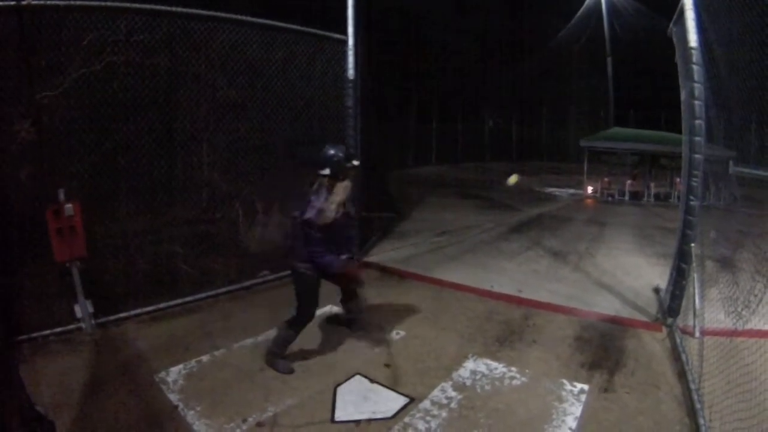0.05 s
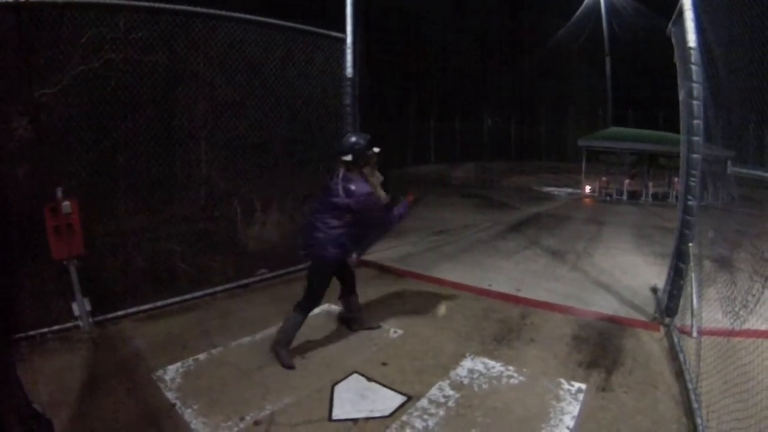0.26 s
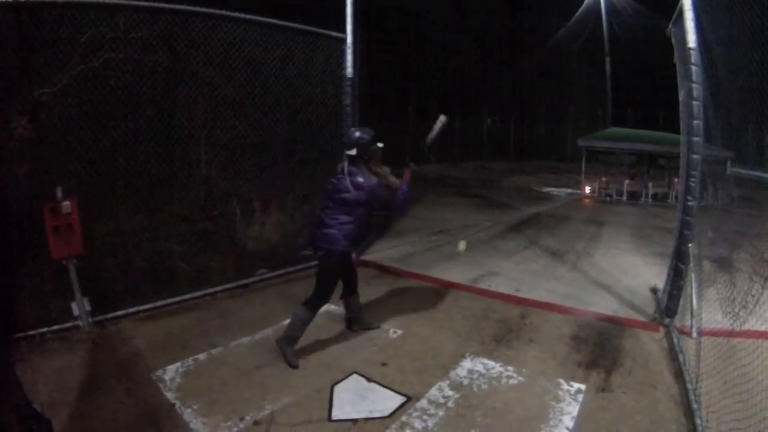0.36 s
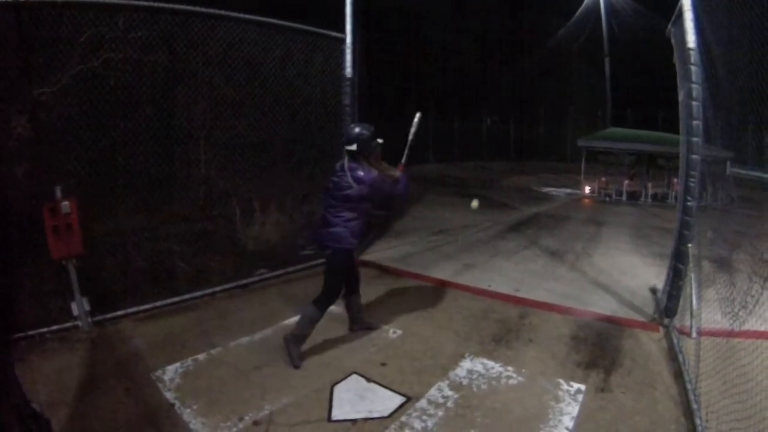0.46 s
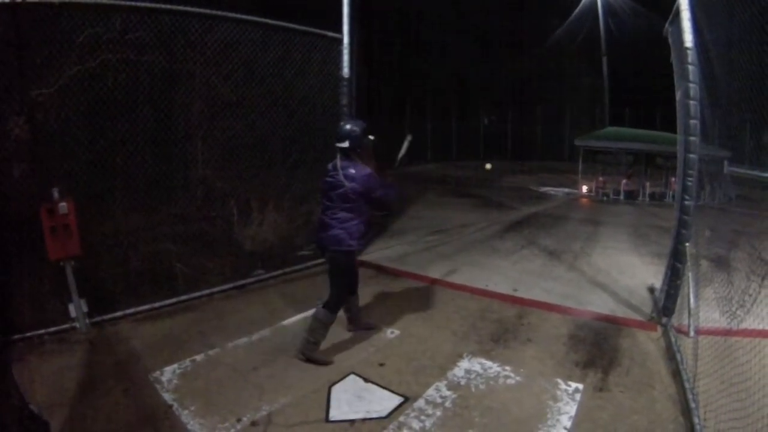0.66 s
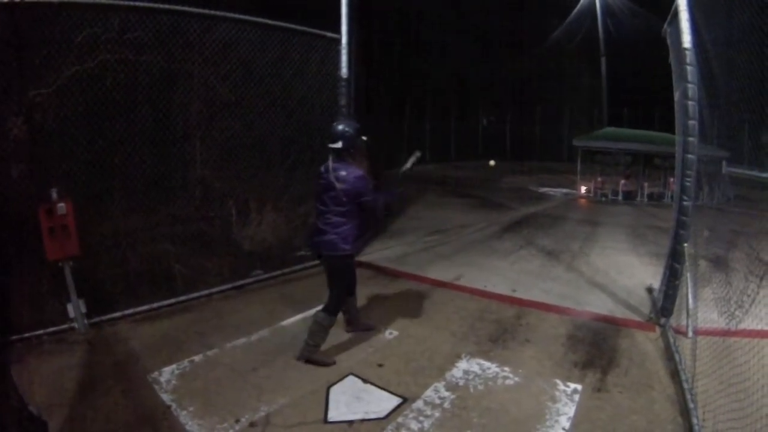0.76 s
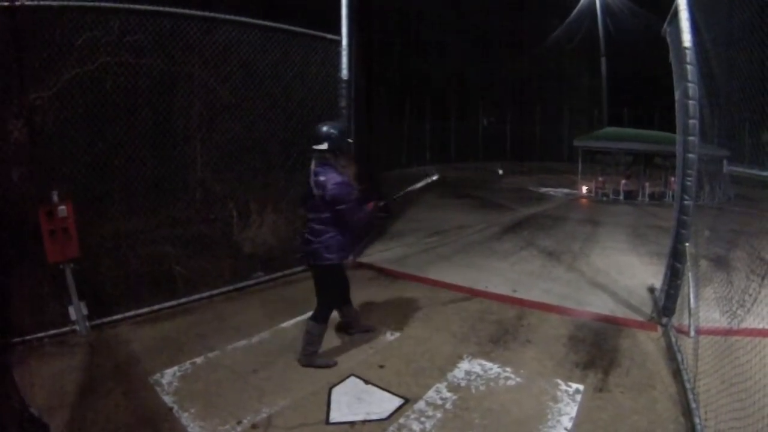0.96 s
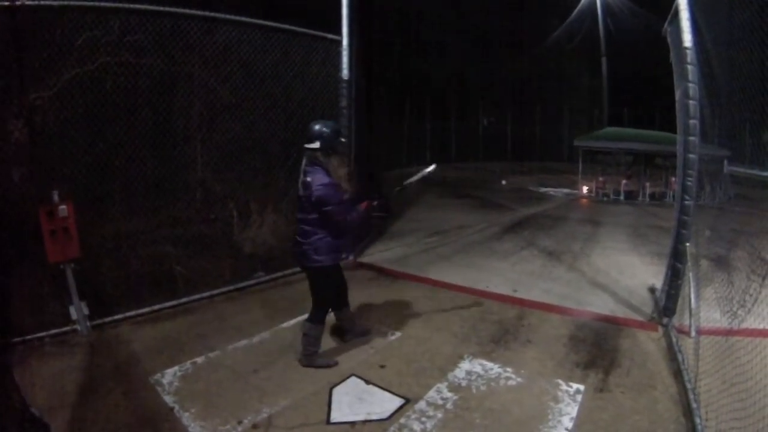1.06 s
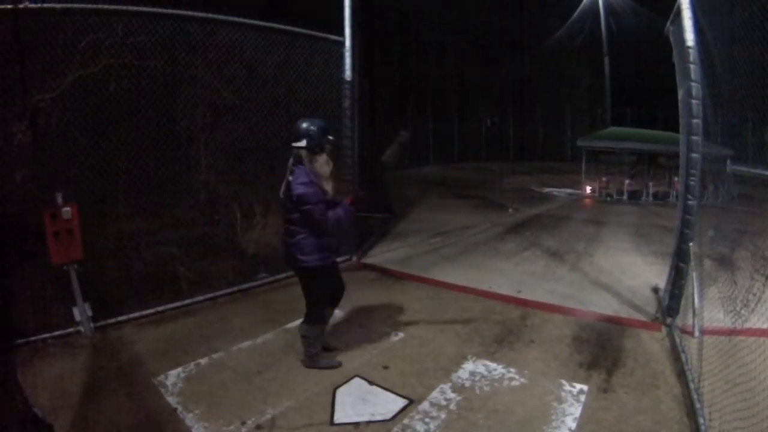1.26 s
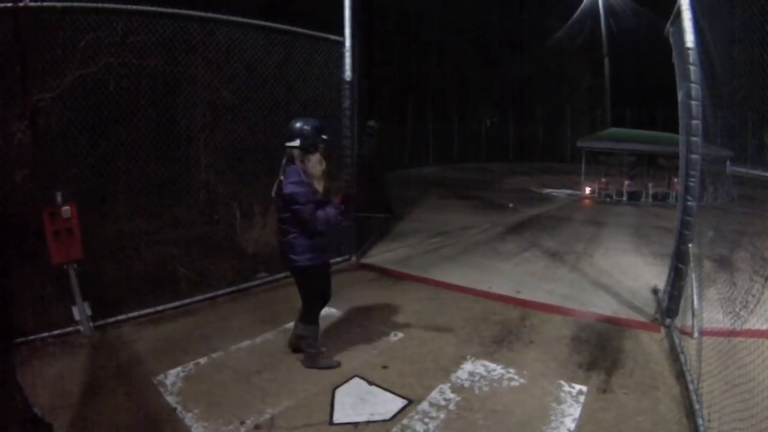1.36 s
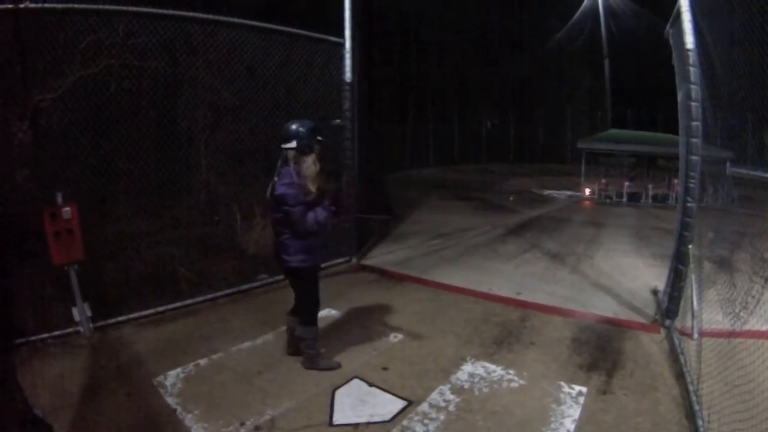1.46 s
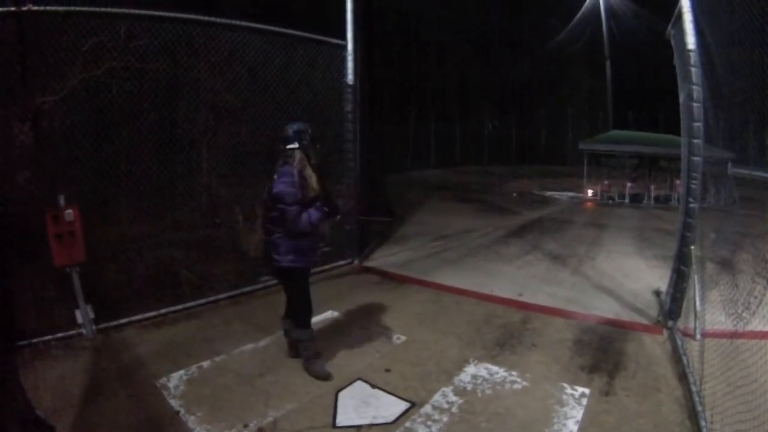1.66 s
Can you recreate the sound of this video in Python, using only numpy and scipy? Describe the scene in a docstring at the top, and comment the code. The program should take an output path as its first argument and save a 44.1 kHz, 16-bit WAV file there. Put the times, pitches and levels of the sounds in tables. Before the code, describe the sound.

Bat-on-ball crack with a short metallic ring, then one duller bounce off concrete almost immediately, slight cage echoes, then near quiet with low hum, rumble, faint hiss and soft foot shuffles, single mono microphone outdoors.

```python
"""An outdoor batting cage at night: a wavering motor hum (a sine) over low rumble and faint hiss (shaped noise).
The batter's feet shuffle softly just before the hit, soon after it and again near the end:
low decaying sines and noise scuffs.
A metal bat hits the ball: a hard noise crack and a short ping of decaying barrel modes, with dull cage echoes.
The ball is driven into the concrete and bounces once: a noise slap over a hollow knock of decaying modes."""
import sys
import numpy as np
from scipy import signal
from scipy.fft import rfft, irfft
from scipy.io import wavfile

SR = 44100
rng = np.random.default_rng(int(sys.argv[2]) if len(sys.argv) > 2 else 0)


def to_wav(s):
    """Save 16-bit WAV."""
    ch = np.atleast_2d(s).T  # columns
    pcm = np.round(np.clip(ch, -1, 1) * 32767)  # PCM
    wavfile.write(sys.argv[1], SR, pcm.astype(np.int16))


N = 74970
TIME = np.arange(N) / SR


def from_db(db):
    """Decibels to amplitude gain."""
    return 10 ** (np.asarray(db) / 20)


def rms_one(x):
    """Scale to an rms of 1."""
    return x / np.sqrt(np.mean(x ** 2) + 1e-20)


def noise(spectrum):
    """White noise coloured by a spectrum interpolated over log frequency, rms 1."""
    point_hz, point_db = np.transpose(spectrum)
    bin_hz = np.maximum(np.arange(N // 2 + 1) * SR / N, 1)
    gain = from_db(np.interp(np.log(bin_hz), np.log(point_hz), point_db))
    white = rng.standard_normal(N)
    return rms_one(irfft(rfft(white) * gain, N))


def drift(rate_hz):
    """Slow random wander, rms 1: white noise through two equal one-pole lowpasses."""
    pole = np.exp(-2 * np.pi * rate_hz / SR)
    wander = signal.lfilter([1], [1, -2 * pole, pole * pole], rng.standard_normal(2 * N))
    return rms_one(wander[N:])  # the first half lets the filter settle


def envelope(start_s, rise_s, t60_s):
    """A straight rise, then an exponential decay that falls 60 dB in t60_s."""
    age = TIME - start_s
    attack = np.clip(age / rise_s, 0, 1)
    return attack * from_db(-60 * np.maximum(age - rise_s, 0) / t60_s)


def ring(start_s, modes, rise_s, clock=TIME):
    """Decaying sines set off by one blow, neighbouring modes in opposite polarity."""
    out = np.zeros(N)
    for k, (pitch_hz, level_db, t60_s) in enumerate(modes):
        tone = np.sin(2 * np.pi * pitch_hz * (clock - start_s))
        out += (-1) ** k * from_db(level_db) * envelope(start_s, rise_s, t60_s) * tone
    return out


HUM_HZ, HUM_WANDER_HZ = 102.74, 2.2   # mean pitch and rms wander
HUM_DB, HUM_WAVER_DB = -58.5, 3   # mean level and rms waver
RUMBLE_DB, AIR_DB = -57, -60
RUMBLE_FOLLOWS = 0.46   # share of the swell, in dB, that the rumble takes
# colour of the low rumble: freq_hz, density_db (relative)
RUMBLE_COLOUR = [(15, -7), (30, 0), (45, -2), (62, 0), (85, -8.5), (125, -1), (165, -13), (230, -31),
                 (500, -90)]
# uneven swell of the rumble: time_s, swell_db (before its mean is removed and RUMBLE_FOLLOWS scales it)
RUMBLE_SWELL = [(0.0, -51), (0.036, -59.5), (1.258, -65.5), (1.296, -55), (1.41, -67), (1.618, -54.5),
                (1.642, -69), (1.7, -67.5)]
# colour of the night air's hiss: freq_hz, density_db (relative)
AIR_COLOUR = [(80, -22.5), (150, -4), (200, -1), (260, -6.5), (380, -9), (580, -13.5), (850, -14.5),
              (1450, -17), (2100, -13.5), (2750, -20.5), (5100, -23.5), (8000, -30), (10500, -31.5),
              (13500, -35.5), (15000, -37)]


def background():
    """A motor hum wandering in pitch and level, a swelling low rumble and steady hiss."""
    turns = np.cumsum(HUM_HZ + HUM_WANDER_HZ * drift(4.9)) / SR
    hum_gain = from_db(HUM_DB + HUM_WAVER_DB * drift(2.5))
    hum = hum_gain * np.sqrt(2) * np.sin(2 * np.pi * turns)  # sqrt(2) gives the sine an rms of 1
    swell_db = np.interp(TIME, *np.transpose(RUMBLE_SWELL))
    rumble_db = RUMBLE_DB + RUMBLE_FOLLOWS * (swell_db - swell_db.mean())
    rumble = from_db(rumble_db) * noise(RUMBLE_COLOUR)
    hiss = from_db(AIR_DB) * noise(AIR_COLOUR)
    return hum + rumble + hiss


STEP_T60_S = 0.027
SCUFF_RISE_S, SCUFF_T60_S = 0.0028, 0.029   # the footfalls share this rise
SCUFF_WIDTH = .25   # bandwidth as a share of the centre frequency
# soft footfalls: start_s, level_db, pitch_hz
STEPS = [(0.1763, -37.5, 102), (1.608, -35, 44.3)]
# scuffs of shoes and jacket: start_s, level_db (rms before the envelope), centre_hz
SCUFFS = [(0.175, -54.5, 307), (0.303, -52, 654), (.387, -55, 590), (0.532, -56.5, 594),
          (1.354, -57.5, 2040), (1.492, -65, 2050)]


def batter():
    """Footfalls as short low sines, scuffs as short bursts of narrow-band noise."""
    out = np.zeros(N)
    for start_s, level_db, pitch_hz in STEPS:
        out += ring(start_s, [(pitch_hz, level_db, STEP_T60_S)], SCUFF_RISE_S)
    for start_s, level_db, centre_hz in SCUFFS:
        band = signal.iirpeak(centre_hz, 1 / SCUFF_WIDTH, fs=SR)
        rub = rms_one(signal.lfilter(*band, rng.standard_normal(N)))
        out += from_db(level_db) * envelope(start_s, SCUFF_RISE_S, SCUFF_T60_S) * rub
    return out


HIT_S = 0.2205   # the bat meets the ball
CONTACT_S = 0.00079   # rise time of the barrel's ringing and of the ball's push
CRACK_DB, CRACK_RISE_S, CRACK_T60_S = -24.5, .0013, 0.028
SCATTER_DB, SCATTER_RISE_S, SCATTER_T60_S = -46.5, .01, 0.19
SNAP_AFTER_S, SNAP_RISE_S = .0012, .0005
BAT_DB = 1   # trim on the short bat modes
# in the follow-through the barrel turns away, so its pitch drops a little
RECEDE_M_PER_S, TURN_S, SOUND_M_PER_S = 4.6, .035, 343
# colour of the crack: freq_hz, density_db (relative)
CRACK_COLOUR = [(120, -12), (330, -8), (500, -20), (780, -5.5), (1250, -6), (1800, 0.5), (2400, 5.5),
                (3100, -6), (4900, -7.5), (6200, -23), (7400, -7), (8500, -17), (9400, -26), (15000, -31.5)]
# colour of sound scattered by posts and fence: freq_hz, density_db (relative)
SCATTER_COLOUR = [(150, -8), (500, -10), (1800, 0), (3500, -6), (6000, -16), (7300, -13), (9500, -27),
                  (15000, -38)]
# short-lived modes of the bat: pitch_hz (before the turn), level_db (before BAT_DB), t60_s
BAT_MODES = [(715, -44, .06), (1040, -42, .04), (1470, -39, .042), (1755, -36.5, .04), (2045, -36, .042),
             (2938, -40, .048), (3165, -39, .048), (3620, -45, .04), (3908, -42, .045), (4385, -44, .035),
             (4815, -36, .04), (5795, -45.5, .048), (7148, -36, .042)]
# the barrel's split hoop mode beats and falls fast at first, then rings on:
# pitch_hz (before the turn), level_db, t60_s
PING = [(2518, -31, .08), (2458, -33.5, .115), (2518, -38, .335)]
# the snap as the ball springs off the barrel: pitch_hz, level_db, t60_s
SNAP = [(2350, -21, .005), (4600, -32, .006), (7500, -35, .006)]
# the ball's dull push on the bat: pitch_hz, level_db, t60_s
PUSH = [(124, -52, 0.033), (347, -45, 0.034)]


def bat():
    """A noise crack and its scatter, with barrel modes whose pitch drops as the barrel recedes."""
    crack = from_db(CRACK_DB) * envelope(HIT_S, CRACK_RISE_S, CRACK_T60_S) * noise(CRACK_COLOUR)
    scatter_envelope = envelope(HIT_S, SCATTER_RISE_S, SCATTER_T60_S)
    scatter = from_db(SCATTER_DB) * scatter_envelope * noise(SCATTER_COLOUR)

    # Doppler: growing distance delays the clock that the ringing follows
    speed = RECEDE_M_PER_S * np.clip((TIME - HIT_S) / TURN_S, 0, 1) ** 2
    distance_m = np.cumsum(speed) / SR
    clock = TIME - distance_m / SOUND_M_PER_S
    clank = from_db(BAT_DB) * ring(HIT_S, BAT_MODES, CONTACT_S, clock)
    # rung one by one so that all parts keep the same polarity
    ping = sum(ring(HIT_S, [part], CONTACT_S, clock) for part in PING)

    snap = ring(HIT_S + SNAP_AFTER_S, SNAP, SNAP_RISE_S)
    push = ring(HIT_S, PUSH, CONTACT_S)
    return crack + snap + scatter + clank + ping + push


ECHO_CUT_HZ = 4300
# echoes from the cage: delay_s, level_db
ECHOES = [(.010, -28), (.031, -24.5)]


def cage(blows):
    """Delayed copies of the blows, dulled by a gentle lowpass."""
    lowpass = signal.butter(1, ECHO_CUT_HZ, fs=SR, output="sos")
    dull = signal.sosfilt(lowpass, blows)
    return sum(from_db(level_db) * np.interp(TIME - delay_s, TIME, dull, left=0)
               for delay_s, level_db in ECHOES)


BOUNCE_S = .3078   # the ball lands on the concrete
SLAP_DB, SLAP_RISE_S, SLAP_T60_S = -35.5, 0.0013, 0.013
SLAP_TAIL_DB, SLAP_TAIL_T60_S = -53.5, 0.14
BALL_DB = -0.5   # trim on the ball modes
# colour of the slap: freq_hz, density_db (relative)
SLAP_COLOUR = [(150, 10.5), (600, -11), (1050, -2), (2400, -2), (3900, -7), (5800, -14), (7600, -6.5),
               (8500, -12), (9600, -25), (15000, -36)]
# modes of the ball: pitch_hz, level_db (before BALL_DB), t60_s
BALL_MODES = [(150, -38, .035), (240, -31, .032), (1065, -31, .016), (1630, -40, .015), (2200, -29, .014),
              (3505, -38, .016), (4345, -44, .016), (6960, -47, .016)]


def bounce():
    """The ball slaps the concrete: a noise burst and its tail over a dull, hollow knock of modes."""
    slap = from_db(SLAP_DB) * envelope(BOUNCE_S, SLAP_RISE_S, SLAP_T60_S) * noise(SLAP_COLOUR)
    tail_envelope = envelope(BOUNCE_S, SCATTER_RISE_S, SLAP_TAIL_T60_S)
    tail = from_db(SLAP_TAIL_DB) * tail_envelope * noise(SCATTER_COLOUR)
    knock = from_db(BALL_DB) * ring(BOUNCE_S, BALL_MODES, SLAP_RISE_S)
    return slap + tail + knock


def scene():
    """Hit and bounce with their cage echoes, over the batter's feet and the night background."""
    blows = bat() + bounce()
    mix = background() + batter() + blows + cage(blows)
    return mix[None]  # one channel


CUTOFF_HZ = 15000


def record(dry):
    """A steep elliptic lowpass cuts the top."""
    lowpass = signal.ellip(10, .1, 70, CUTOFF_HZ, fs=SR, output="sos")  # order, ripple dB, stopband dB
    return signal.sosfilt(lowpass, dry)


dry = scene()
out = record(dry)
to_wav(out)
```